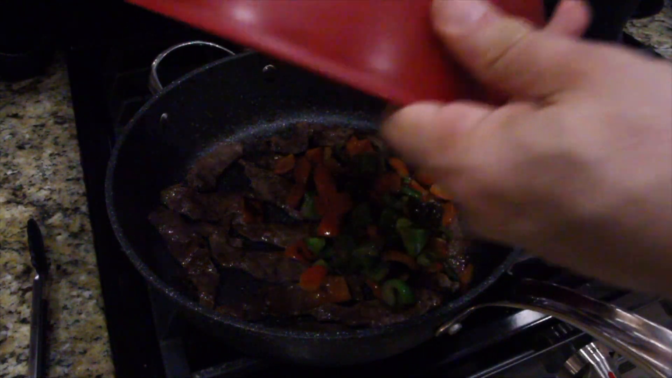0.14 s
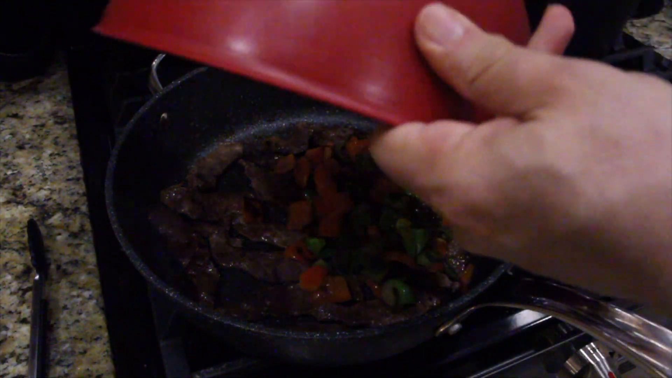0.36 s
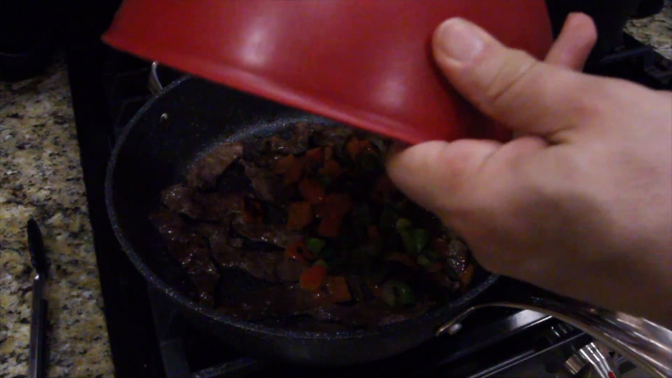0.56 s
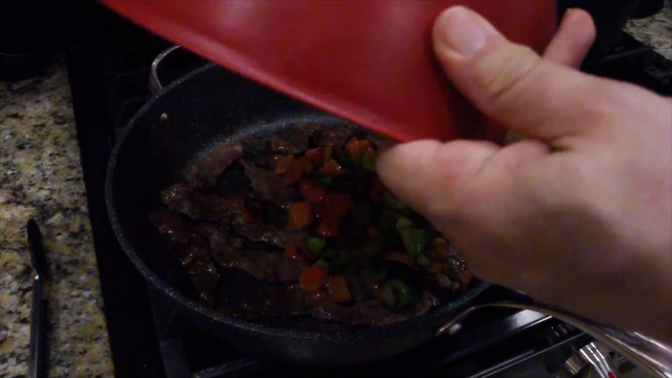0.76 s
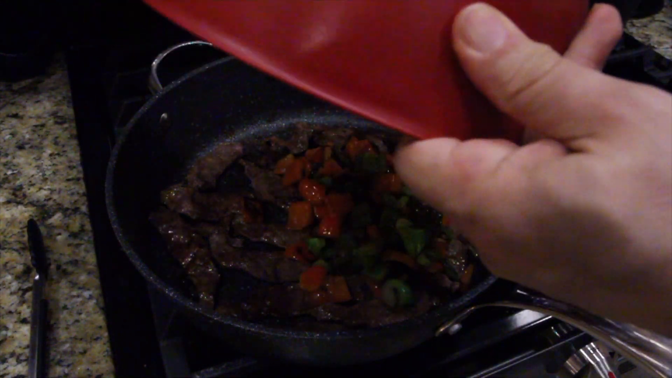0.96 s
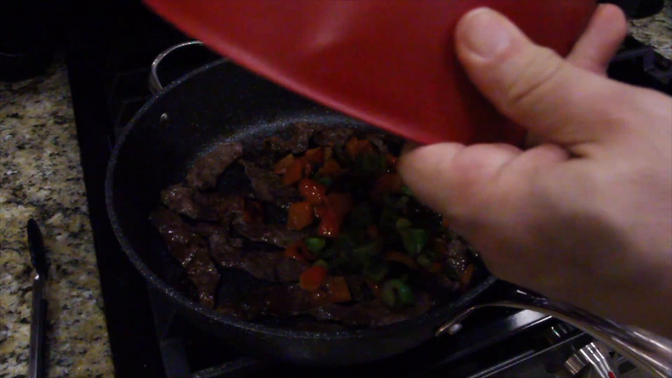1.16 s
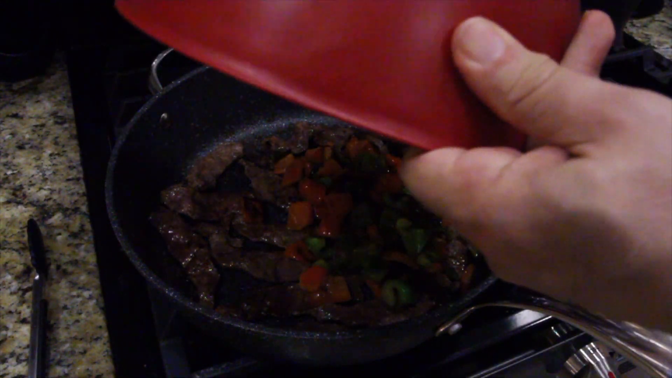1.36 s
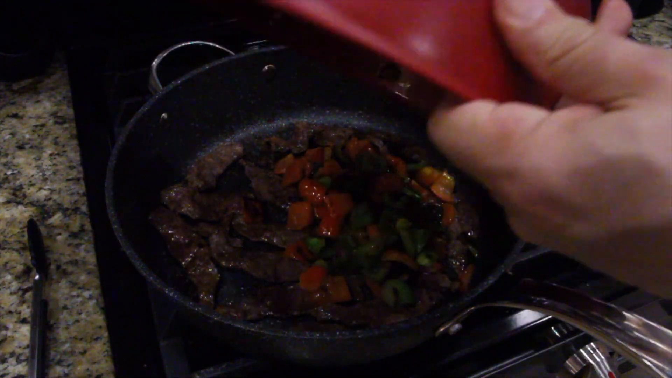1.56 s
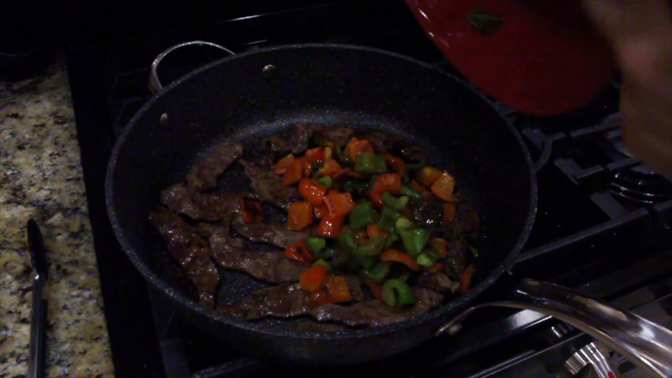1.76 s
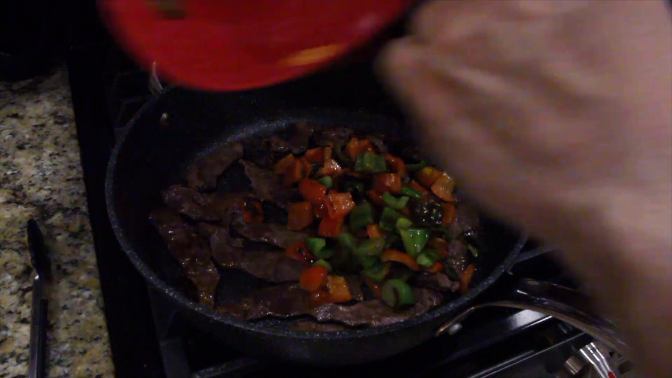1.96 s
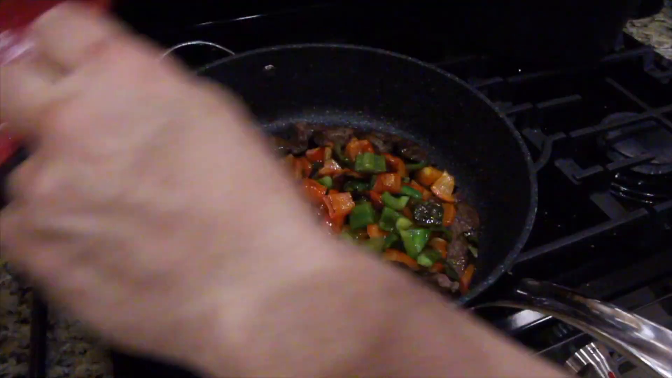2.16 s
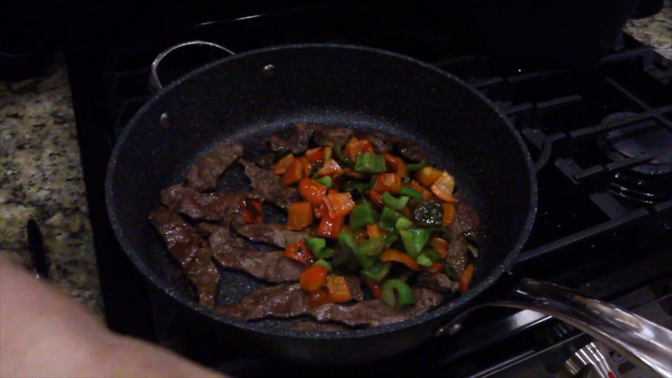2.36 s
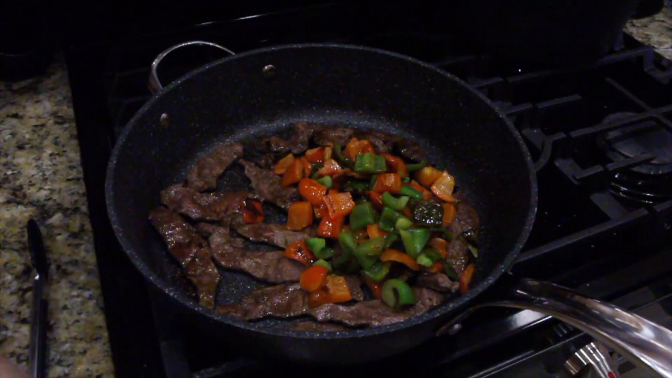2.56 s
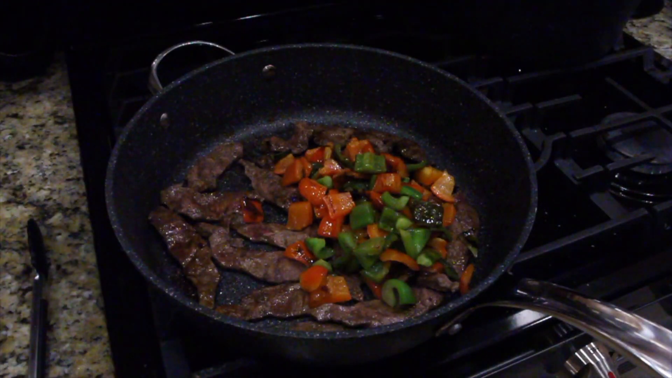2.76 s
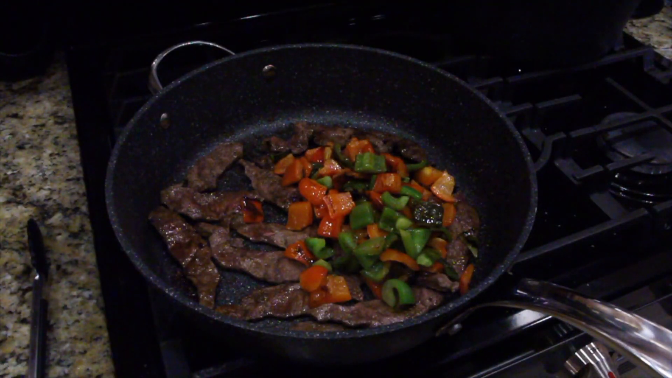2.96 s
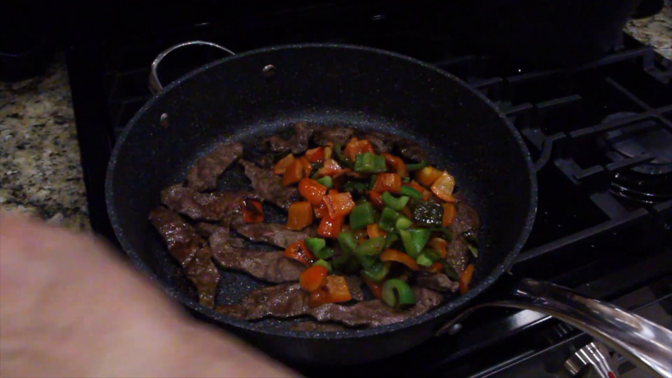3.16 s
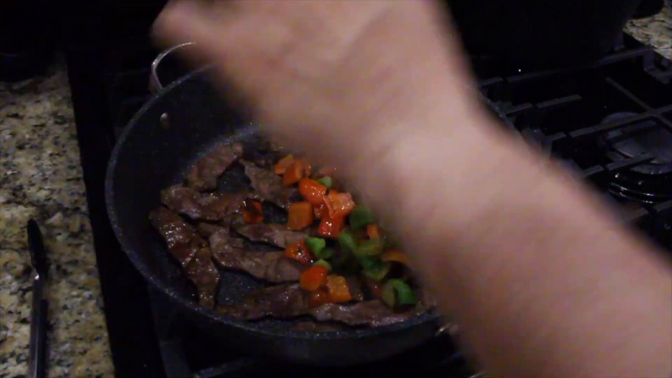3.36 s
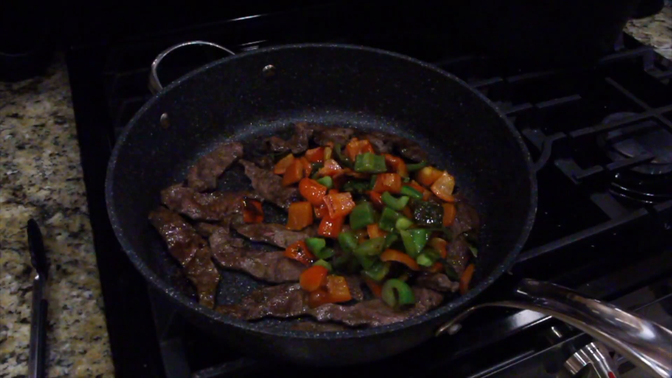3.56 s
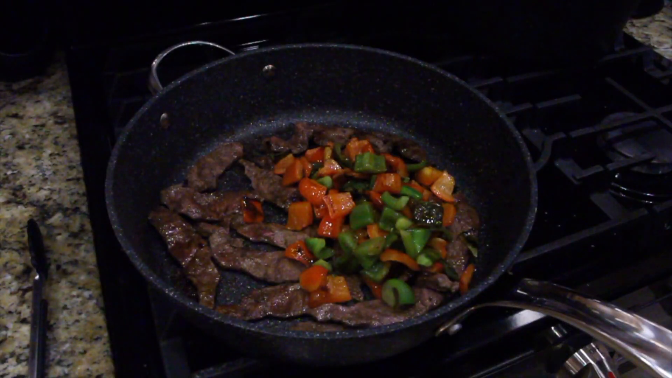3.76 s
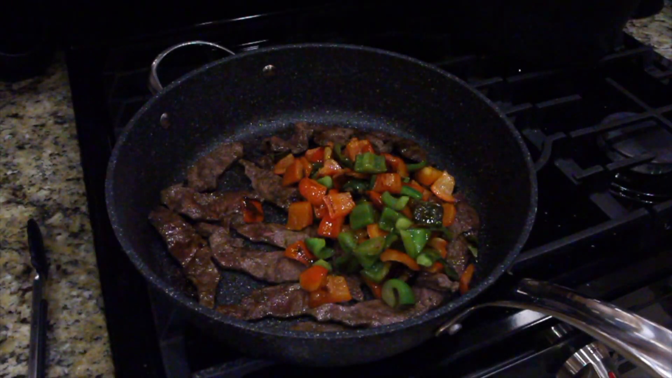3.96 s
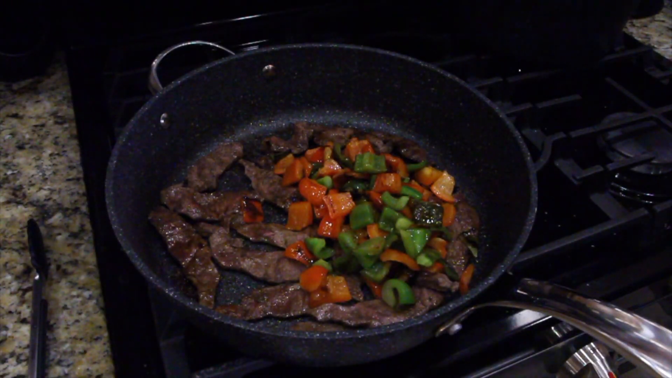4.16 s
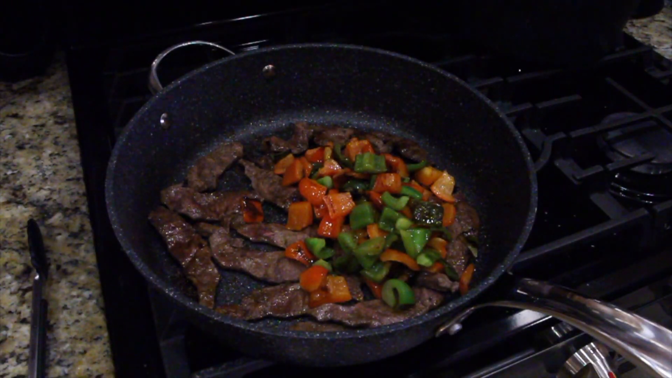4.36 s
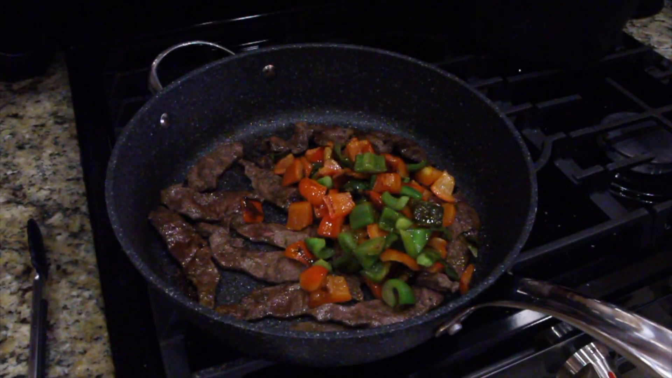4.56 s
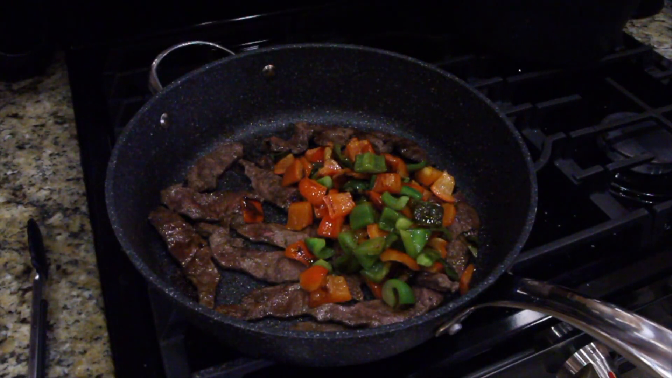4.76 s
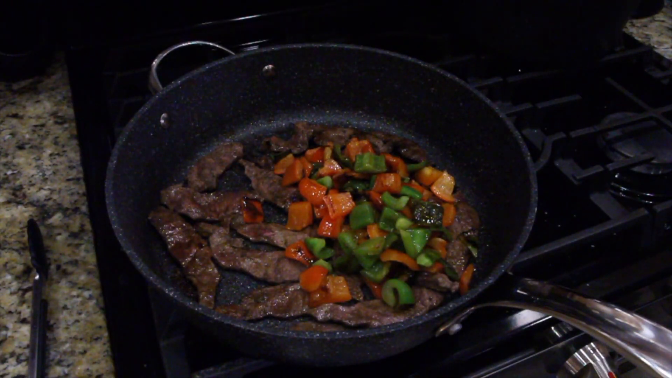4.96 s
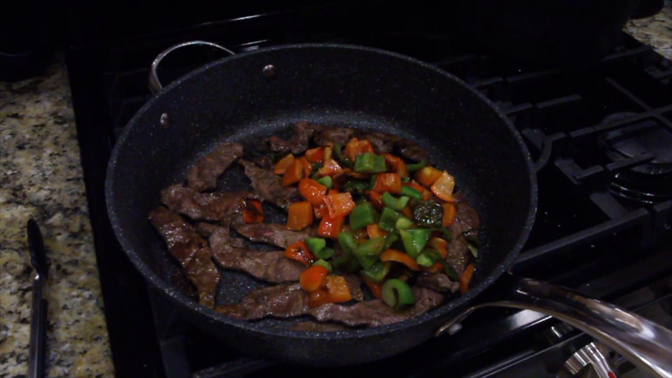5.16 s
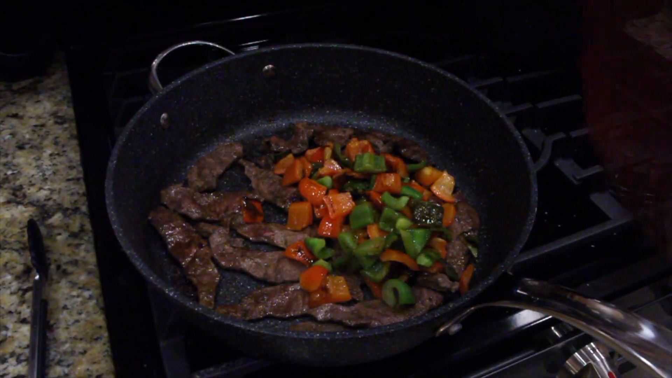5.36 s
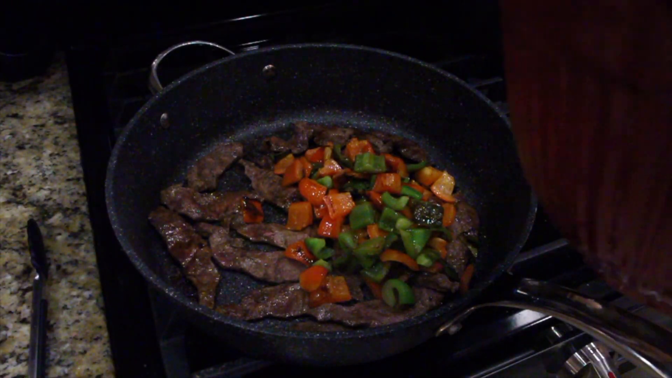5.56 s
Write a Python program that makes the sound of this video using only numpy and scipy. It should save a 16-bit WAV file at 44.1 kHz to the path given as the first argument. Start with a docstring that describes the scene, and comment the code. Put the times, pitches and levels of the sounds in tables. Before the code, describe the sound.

A steady, fizzy skillet sizzle fills a small home kitchen, heard close and mono. Crisp fat droplets spit and steam ticks. Midway comes a loud, hollow plastic knock with a quick second knock, then a bright steel clack on the counter, followed by a dull bump and brief scuffing. The frying carries on unchanged, with faint hum and a short room tail.

```python
"""A home kitchen: meat and peppers sizzle in a skillet, close to a mono microphone.
Tens of thousands of tiny steam bubbles ring briefly in the fat; droplets spit, steam pockets pop,
and a passing arm twice dulls the frying. A plastic bowl is put down hard on the counter and rocks once;
then a metal utensil clacks down: both are knocks of filtered noise with decaying modes.
Soft thuds and gritty scuffs are shaped noise, over a low rumble, a faint hum and the room's diffuse tail."""
import sys
import numpy as np
from scipy import signal
from scipy.fft import rfft, irfft, next_fast_len
from scipy.io import wavfile
from scipy.ndimage import uniform_filter1d

SR = 44100
rng = np.random.default_rng(int(sys.argv[2]) if len(sys.argv) > 2 else 0)


def wav_out(sig):
    """Save sig, one row per channel (or a flat mono array), as 16-bit PCM at SR to the path in sys.argv[1]."""
    wavfile.write(sys.argv[1], SR, np.round(np.clip(np.atleast_2d(sig).T, -1, 1) * 32767).astype(np.int16))


N = 247380  # samples
T = np.arange(N) / SR  # seconds


def undb(db):
    """Decibels to gain."""
    return 10 ** (np.asarray(db) / 20)


def unit(x):
    """Scale to rms 1."""
    return x / np.sqrt(np.mean(x ** 2))


def fade(t60, size=SR):
    """Exponential decay that loses 60 dB in t60 seconds."""
    return np.exp(-np.log(1000) * T[:size] / t60)


def read_curve(points, hz):
    """Join (pitch_hz, value) points on a logarithmic frequency axis."""
    point_hz, value = np.transpose(points)
    return np.interp(np.log(np.maximum(hz, 1)), np.log(point_hz), value)


def colour(x, points):
    """Causal minimum-phase filter with the given (pitch_hz, level_db) response, made through the cepstrum."""
    size = 2 * next_fast_len(len(x))
    gain = undb(read_curve(points, np.fft.rfftfreq(size, 1 / SR)))
    cepstrum = irfft(np.log(gain))
    # fold the cepstrum so that nothing sounds before its cause
    cepstrum[1:size // 2] *= 2
    cepstrum[size // 2 + 1:] = 0
    response = np.exp(rfft(cepstrum))
    return irfft(rfft(x, size) * response)[:len(x)]


def resonate(x, hz, width):
    """One resonance with gain 1 at its centre."""
    top = .45 * SR
    centre = min(hz, top)
    b, a = signal.iirpeak(centre, centre / min(width, top / 2), fs=SR)
    return signal.lfilter(b, a, x)


def cut(x, hz, kind, order=2):
    """Butterworth low-pass or high-pass."""
    sos = signal.butter(order, min(hz, .45 * SR), kind, fs=SR, output="sos")
    return signal.sosfilt(sos, x)


def add(out, s, sound):
    """Mix a sound in at time s."""
    i = int(s * SR)
    out[i:i + len(sound)] += sound[:N - i]


def walk(rate):
    """Smooth random wander, drawn anew rate times a second, with a spread near 1."""
    k = int(SR / rate)
    steps = np.repeat(rng.standard_normal(N // k + 1), k)
    return unit(uniform_filter1d(steps, k)[:N])


def bursts(rate, spread_db, cap, flurry):
    """Bubble bursts at random moments: mostly tiny, a few large, coming in flurries."""
    happens = rng.random(N) < rate * flurry / SR
    size_db = spread_db * np.minimum(rng.exponential(size=N), cap)
    return happens * rng.choice([-1, 1], N) * undb(size_db)


JUICE_DB, FAT_DB = -36.5, -34.5  # rms of bubbling juices and fine fizz, before vigour and arm
SHADOW_SHARE = 0.67  # part of the arm's treble loss that the lower, longer waves suffer
# how hard the food fries; it livens up once the peppers have settled in: time_s, level_db
FRY_VIGOUR = [(0, 0), (.3, 0.7), (1.3, -1), (1.85, 0.9), (2.5, 1.2), (3.0, 0.54), (5.6, -0.06)]
# colour of the sizzle before the pan: pitch_hz, relative level_db per Hz
SIZZLE_COLOUR = [(150, -42), (250, -13), (380, -17.5), (436, -8.5), (595, -14), (786, -3.5), (887, -11),
                 (967, -8), (1280, -5.5), (1660, -4), (3260, -1), (5390, -5.5), (8760, -1), (11600, -4.5),
                 (15800, -12)]
# hollow of the pan, resonances added to the sizzle: pitch_hz, width_hz, level_db
PAN_RESONANCES = [(273, 30, 13.5), (454, 70, 3.5), (645, 56, -2.5), (800, 58, -2), (974, 47, 6),
                  (1670, 160, -9.5), (2290, 220, -15.5), (3164, 110, -7), (4480, 730, -9), (7450, 370, -9)]


def sizzle(rate=460, juice_spread_db=3.5, fat_spread_db=2.0, width_share=0.84, flurry_db=1.2,
           hiss_db=-10, split_hz=5700, simmer_db=0.55):
    """Each burst rings for about one cycle in one of 16 pitch bands; the pan colours the crowd."""
    flurry = flurry_db * walk(35)
    crowd = np.zeros(N)
    for hz in np.geomspace(380, 14500, 16):
        spread_db = read_curve([(2000, juice_spread_db), (9000, fat_spread_db)], hz)
        clicks = bursts(rate, spread_db, 5, undb(flurry + 1.4 * walk(12)))
        crowd += unit(resonate(clicks, hz, hz * width_share)) * np.sqrt(hz)
    # the smallest bubbles merge into a hiss
    crowd = unit(crowd) + undb(hiss_db) * rng.standard_normal(N)
    # even out the crowd, then give it the colour of the frying food
    hz, power = signal.welch(crowd, SR, nperseg=256)
    hz, power = hz[1:-1], power[1:-1]
    crowd = colour(crowd, np.c_[hz, read_curve(SIZZLE_COLOUR, hz) - 10 * np.log10(power)])
    crowd = crowd + sum(undb(db) * resonate(crowd, hz, width) for hz, width, db in PAN_RESONANCES)
    crowd = crowd + undb(-11) * kitchen(crowd)
    # juices and fat follow one vigour, which wanders a little
    vigour = np.interp(T, *np.transpose(FRY_VIGOUR)) + simmer_db * walk(6.5)
    shadow = arm_shadow()
    juices = unit(cut(crowd, split_hz, "low", order=3))
    juices = juices * undb(JUICE_DB + vigour - SHADOW_SHARE * shadow)
    fizz = unit(cut(crowd, split_hz, "high", order=3))
    fizz = fizz * undb(FAT_DB + vigour - shadow)
    return juices + fizz


# an arm sweeps between pan and microphone: middle_s, half_length_s, treble_loss_db
ARM_SWEEPS = [(2.106, 0.057, 4.5), (3.346, 0.14, 2)]


def arm_shadow():
    """Treble lost in dB while an arm screens the pan."""
    return sum(db * np.exp(-((T - s) / half) ** 2) for s, half, db in ARM_SWEEPS)


SPIT_HZ, SPIT_SCATTER = 9150, .12  # middle pitch of the small droplets and its relative spread
SMALL_SPITS_PER_S, SMALL_SPIT_DB, SMALL_SPIT_SPREAD_DB = 8, -17, 1.8  # level before the arm's shadow
SNAP_DB, SNAP_GROWTH = -20, 0.45  # snap under a full-scale ring, before its high-pass; dB per dB of ring
RING_CYCLES = 0.74  # a droplet's ring envelope peaks after this many cycles, then dies
# the loudest spitting droplets, peak level of the ring: start_s, level_db, pitch_hz
LOUD_SPITS = [(.121, -20, 9500), (2.030, -18, 8800), (2.317, -4.5, 10200), (2.327, -13, 9800),
              (2.424, -8, 10000), (2.839, -10, 9500), (3.191, -6.5, 10100), (3.228, -11.5, 8600),
              (3.942, -12, 7900), (3.985, -7, 8900), (4.485, -11, 8900), (4.651, -16, 9500)]


def spits(snap_hz=2700, snap_t60=0.0055, room_db=-11):
    """A bursting droplet rings a few cycles over a mid-pitched snap; small ones spit at random."""
    out, t = np.zeros(N), T[:SR // 100]
    moments = T[rng.random(N) < SMALL_SPITS_PER_S / SR]
    small_db = SMALL_SPIT_DB + SMALL_SPIT_SPREAD_DB * rng.standard_normal(N) - arm_shadow()
    small_hz = SPIT_HZ * np.exp(SPIT_SCATTER * rng.standard_normal(N))
    small = [(s, np.interp(s, T, small_db), np.interp(s, T, small_hz)) for s in moments]
    droplets = list(LOUD_SPITS) + small
    for (s, db, hz), detune in zip(droplets, rng.standard_normal(len(droplets))):
        ring = np.sin(2 * np.pi * hz * t) * t * np.exp(-hz * t / RING_CYCLES)
        snap = np.sin(2 * np.pi * snap_hz * np.exp(0.51 * detune) * t)
        snap = cut(snap * fade(snap_t60, size=len(t)), 1400, "high")
        add(out, s, undb(db) * ring / np.abs(ring).max() + undb(SNAP_DB + SNAP_GROWTH * db) * snap)
    return out + undb(room_db) * kitchen(out)


# pockets of steam pop under the food, peak level of the tick: start_s, level_db
STEAM_POPS = [(.521, -26), (1.589, -20), (1.800, -17), (1.857, -15), (2.397, -17), (2.810, -12),
              (3.892, -16.5), (4.47, -19), (4.753, -16), (5.045, -23), (5.574, -18.5)]
# colour of a pop: pitch_hz, relative level_db per Hz
POP_COLOUR = [(300, -20), (1000, -6), (3000, 5), (5000, 0), (12000, -22)]


def pops(splutter_db=-14, splutter_t60=0.024, room_db=-8):
    """A steam pocket opens with a broad tick and splutters briefly."""
    out, size = np.zeros(N), SR // 10
    tick = colour(signal.unit_impulse(size), POP_COLOUR)
    tick = tick / np.abs(tick).max()
    for s, db in STEAM_POPS:
        splutter = unit(colour(rng.standard_normal(size) ** 3, POP_COLOUR))
        splutter = splutter * fade(splutter_t60, size=size)
        add(out, s, undb(db) * (tick + undb(splutter_db) * splutter))
    return out + undb(room_db) * kitchen(out)


def strike(blows, modes, body, tick_db, crack_db, crack_t60):
    """Every blow gives a knock (contact tick and a crack of decaying noise) and a ring of modes."""
    knocks, rings, t = np.zeros(N), np.zeros(N), T[:SR]
    tick = colour(signal.unit_impulse(SR), body)
    tick = undb(tick_db) * tick / np.abs(tick).max()
    for s, db, contact_hz, ring_db in blows:
        # each blow lands on another spot, so the modes answer in another balance
        shape = rng.standard_normal((len(modes), 2))
        ring = np.zeros(SR)
        for (hz, mode_db, t60), (extra_db, phase) in zip(modes, shape):
            ring += undb(mode_db + extra_db) * fade(t60) * np.sin(2 * np.pi * hz * t + np.pi * phase)
        crack = unit(colour(rng.standard_normal(SR), body)) * fade(crack_t60)
        knock = tick + undb(ring_db + crack_db) * crack
        add(knocks, s, undb(db) * cut(knock, contact_hz, "low"))
        add(rings, s, undb(db + ring_db) * cut(ring, contact_hz, "low"))
    return knocks, rings


# bowl meets counter, relative levels: start_s, level_db, contact_lowpass_hz, free_ring_db
BOWL_HITS = [(2.7458, 1.5, 5200, 0), (2.7488, -1, 5100, -5), (2.762, -11, 800, -11), (2.772, -8.5, 800, -2),
             (2.779, -11, 1000, -25), (2.8864, 5, 3500, -21)]
# ringing of the bowl, relative levels: pitch_hz, level_db, t60_s
BOWL_RING = [(180, -35, 0.16), (263, -22, .2), (300, -17, 0.13), (390, -16, 0.2), (486, -12, 0.12),
             (540, -13, 0.21), (582, -13, 0.2), (647, -14, 0.14), (684, -7.5, 0.135), (750, -17, 0.13),
             (1125, -16.5, 0.12), (1333, -8.5, 0.086), (1435, -19, 0.064), (1803, 1, 0.029),
             (1998, -11, 0.04), (2198, -4, 0.041), (2680, -12, 0.05), (3600, -13, 0.03)]
# the dry knock of bowl and counter together: pitch_hz, relative level_db per Hz
BOWL_BODY = [(40, -46), (130, -5.5), (260, -3), (450, 3), (650, 5), (920, -9.5), (1400, -13), (2100, -3.5),
             (3200, -13.5), (6000, -13.5), (15000, -15.5)]


def bowl():
    """The plastic bowl lands, chatters and rocks back onto its foot, as knocks and ringing modes."""
    knocks, rings = strike(BOWL_HITS, BOWL_RING, BOWL_BODY, tick_db=7, crack_db=0.5, crack_t60=0.047)
    # the knock feeds the room more than the ring, so the tail stays smooth
    sound = knocks + rings + undb(-11) * kitchen(knocks + undb(-6.0) * rings)
    return undb(-1) * cut(sound, 140, "high")  # low cut keeps the overloaded knock from booming


# utensil meets counter, relative levels: start_s, level_db, contact_lowpass_hz, free_ring_db
UTENSIL_HITS = [(3.559, -14, 14000, 0.5), (3.566, -3, 18000, 1.5), (3.570, 0, 13000, 0.5),
                (3.573, -5.5, 8000, -2), (3.578, -5, 9000, -1.5), (3.584, -11, 14000, -9),
                (3.593, -6.5, 9000, -7), (3.656, -24, 14000, -16)]
# ringing of the counter (low modes) and the utensil (high modes), relative levels: pitch_hz, level_db, t60_s
CLATTER_RING = [(179.5, -32, 0.26), (254, -42, 0.24), (360, -39, 0.16), (532, -29, 0.19),
                (1910, -13, 0.032), (2220, -39, 0.17), (2535, -27, 0.16), (3640, -35, .2),
                (5200, -26.5, 0.21), (7500, -33, .2), (8600, -22, 0.14), (10832, -20.5, 0.15),
                (11850, -23, .15)]
# the dry clack of the utensil: pitch_hz, relative level_db per Hz
UTENSIL_BODY = [(30, -1), (110, -9), (180, 4), (400, 2.5), (900, 2), (1400, 1), (2000, 3.5), (3200, 2),
                (6000, 2.5), (8500, 4.5), (11000, 0), (13500, 5.5), (16000, -0.5)]


def utensil():
    """Steel clatters on the counter, and both ring briefly."""
    knocks, rings = strike(UTENSIL_HITS, CLATTER_RING, UTENSIL_BODY, tick_db=3, crack_db=-9.0, crack_t60=0.098)
    room = kitchen(knocks + rings / 3)
    return undb(0.5) * (knocks + rings + undb(-9) * room)


# things being handled, rms level before the decay: start_s, level_db, pitch_hz, t60_s
SOFT_THUDS = [(0.286, -46, 80, 0.4), (1.38, -45, 360, 0.36), (3.75, -36.5, 220, 0.34),
              (3.753, -31.5, 507, 0.25), (3.768, -38, 34.3, .35), (3.945, -48.5, 34.8, 0.34),
              (4.314, -40, 119, 0.19)]


def thuds(rise_s=0.0028):
    """Dull bumps through counter and floor: broadly resonant noise that swells fast and decays."""
    out = np.zeros(N)
    for s, db, hz, t60 in SOFT_THUDS:
        body = resonate(rng.standard_normal(SR), hz, hz)
        body = unit(resonate(body, hz, 2 * hz))
        swell = 1 - np.exp(-T[:SR] / rise_s)
        add(out, s, undb(db) * body * fade(t60) * swell)
    return out


# something scuffs over the counter as it bumps down, rms level before the decay: start_s, level_db
COUNTER_SCUFFS = [(3.755, -35.5), (3.803, -34)]


def scuffs(grains_per_s=900, grit_hz=1100, grit_width_hz=2200, t60=.16):
    """Gritty contact clicks that die away as the sliding stops."""
    out = np.zeros(N)
    for s, db in COUNTER_SCUFFS:
        grains = (rng.random(SR) < grains_per_s / SR) * rng.standard_normal(SR)
        grit = unit(resonate(grains, grit_hz, grit_width_hz))
        add(out, s, undb(db) * grit * fade(t60))
    return out


# reverberation of the kitchen: pitch_hz, t60_s
KITCHEN_DECAY = [(100, 0.61), (500, 0.53), (2000, 0.62), (5000, 0.44), (9000, 0.46), (16000, 0.1)]


def kitchen(x, build_s=0.017):
    """Diffuse tail of the room: octaves of noise that build up quickly, the top treble dying first."""
    noise, hz = rfft(rng.standard_normal(SR)), np.arange(SR // 2 + 1)
    octave = np.round(np.log2(np.maximum(hz, 100)))
    tail = np.zeros(SR)
    for k in np.unique(octave):
        tail += irfft(noise * (octave == k), SR) * fade(read_curve(KITCHEN_DECAY, 2 ** k))
    tail = tail * (1 - np.exp(-(T[:SR] / build_s) ** 2))
    return signal.fftconvolve(x, unit(tail) / np.sqrt(SR))[:N]


# colour of the kitchen background: pitch_hz, relative level_db per Hz
RUMBLE_COLOUR = [(20, 0.5), (45, 1.5), (80, -0.5), (115, -1.5), (160, -1.5), (230, -4.5), (400, -3),
                 (1000, -21.5)]


def background(rumble_db=-54, hum_hz=119, hum_db=-68):
    """Low rumble of burner and room, wandering in level, with a faint steady appliance hum."""
    rumble = unit(colour(rng.standard_normal(N), RUMBLE_COLOUR)) * undb(rumble_db + walk(5.01))
    hum = undb(hum_db) * unit(np.sin(2 * np.pi * hum_hz * T))
    return rumble + hum


def scene():
    """All sources reach one microphone, which feeds both channels."""
    frying = sizzle() + spits() + pops()
    counter = bowl() + utensil() + thuds() + scuffs()
    mono = frying + counter + background()
    return np.array([mono, mono])


def record(dry, top_hz=15850):
    """Peaks beyond full scale overload the input and clip; then the top is cut."""
    clipped = np.clip(dry, -1, 1)
    return signal.sosfilt(signal.ellip(10, .1, 70, top_hz, fs=SR, output="sos"), clipped)


dry = scene()
out = record(dry)
wav_out(out)
```